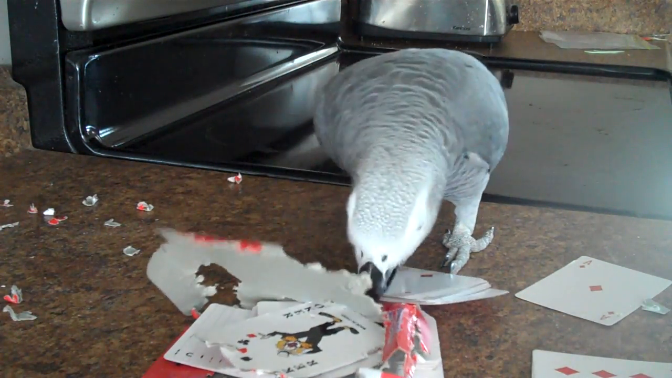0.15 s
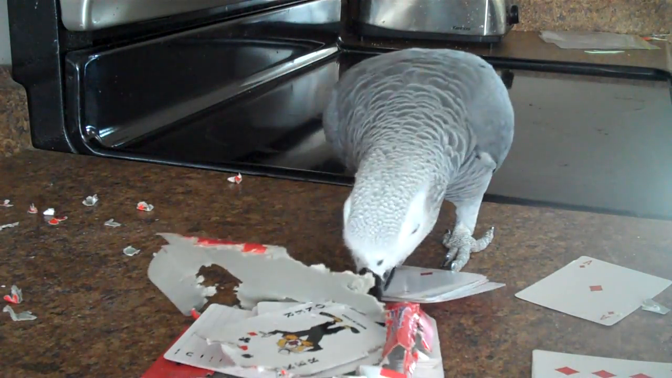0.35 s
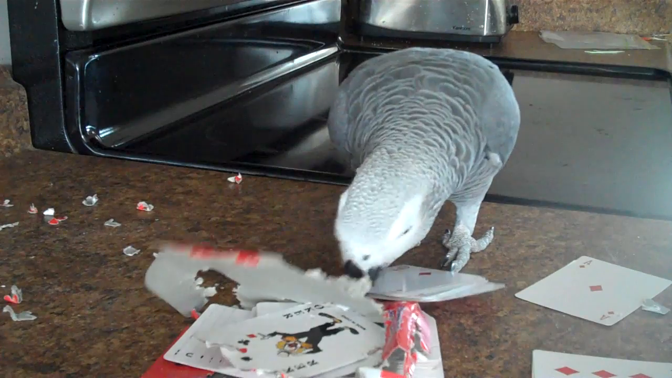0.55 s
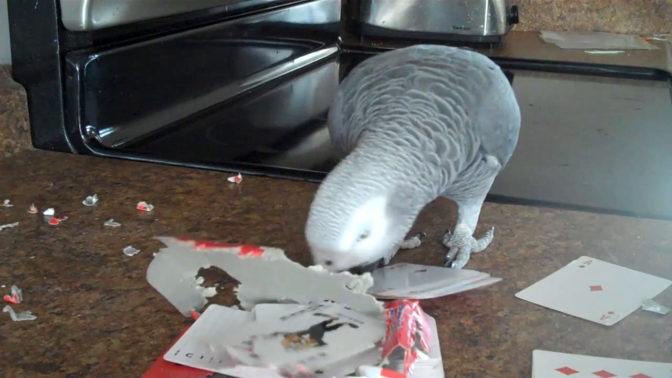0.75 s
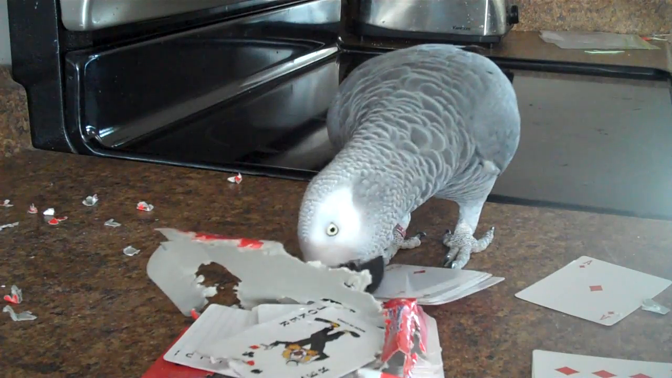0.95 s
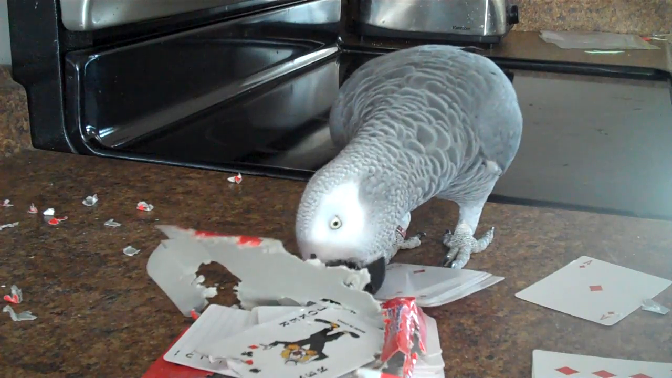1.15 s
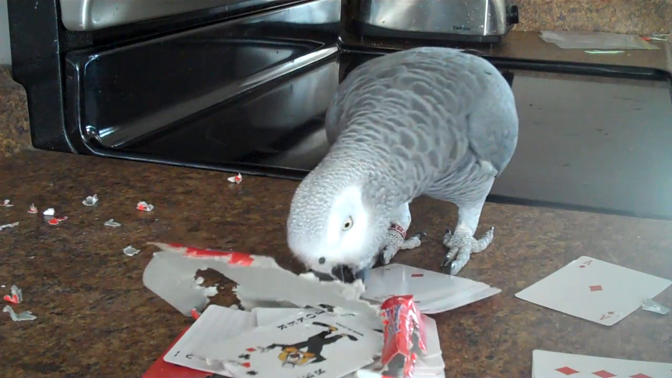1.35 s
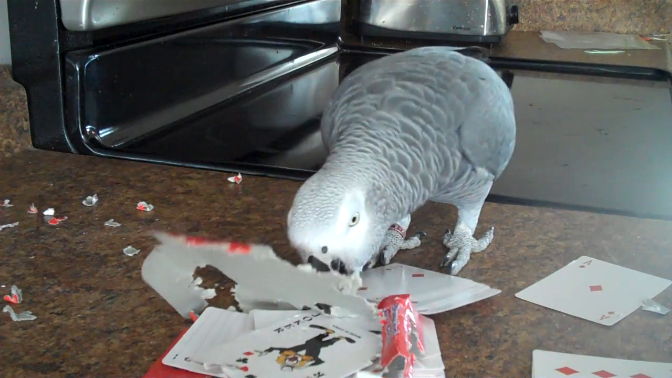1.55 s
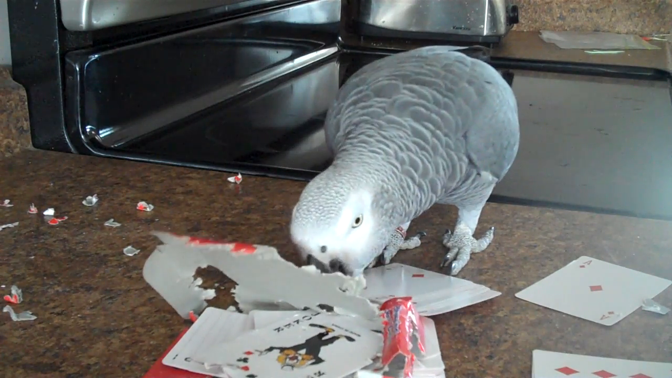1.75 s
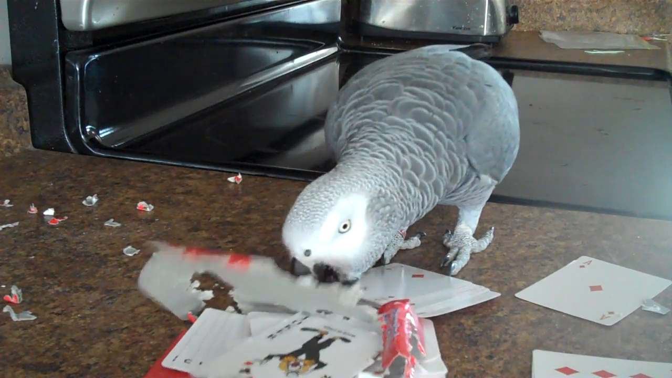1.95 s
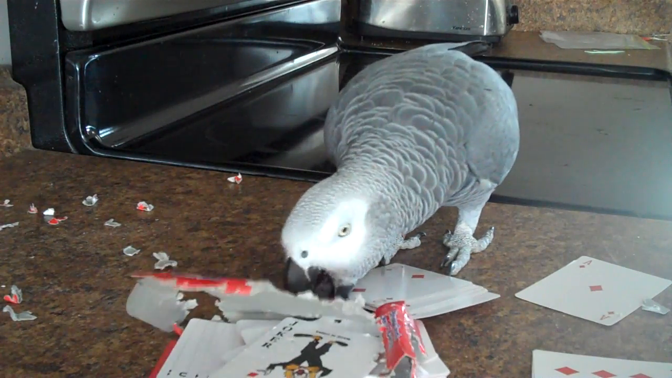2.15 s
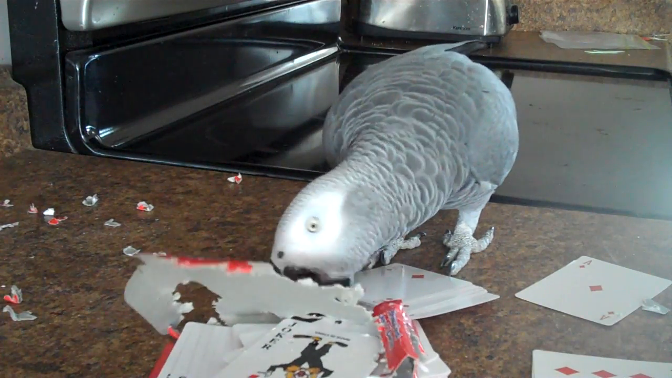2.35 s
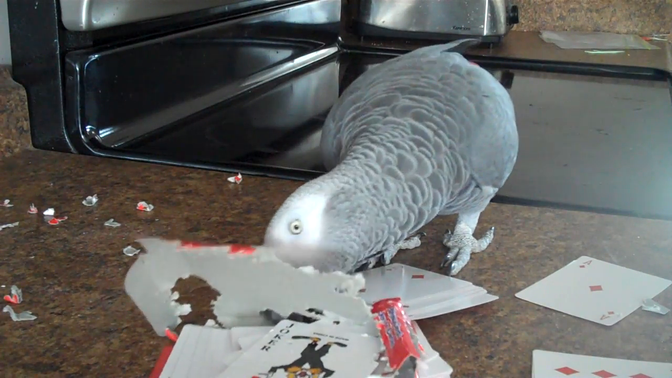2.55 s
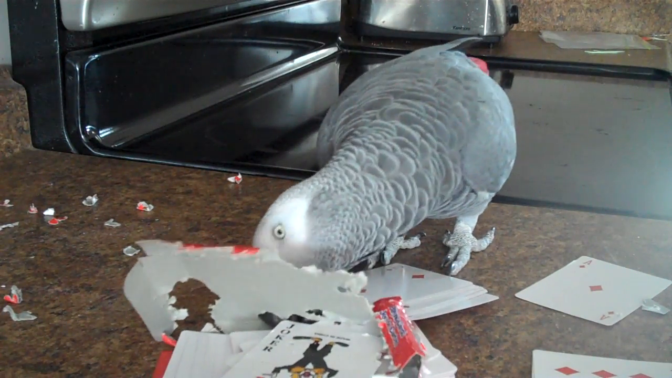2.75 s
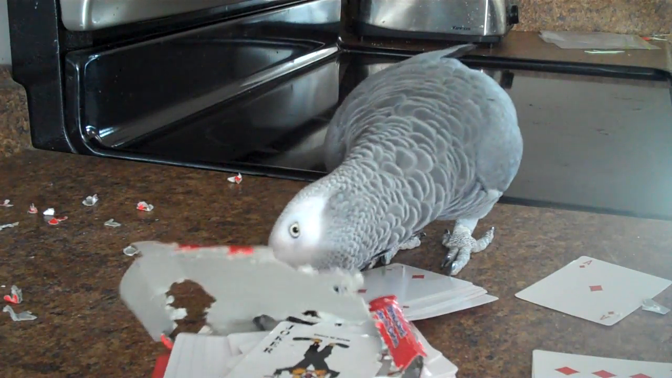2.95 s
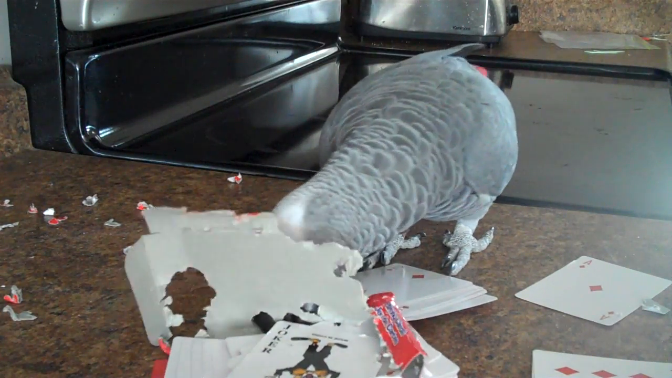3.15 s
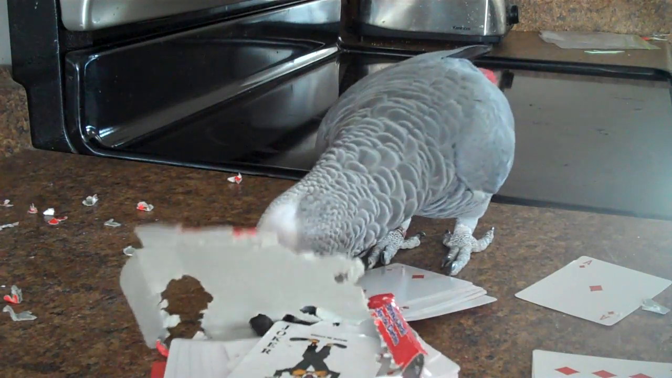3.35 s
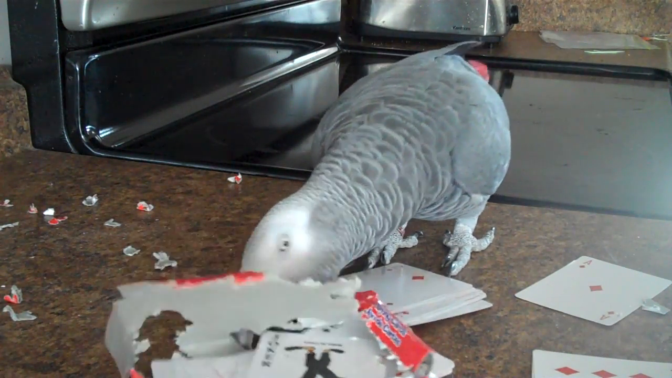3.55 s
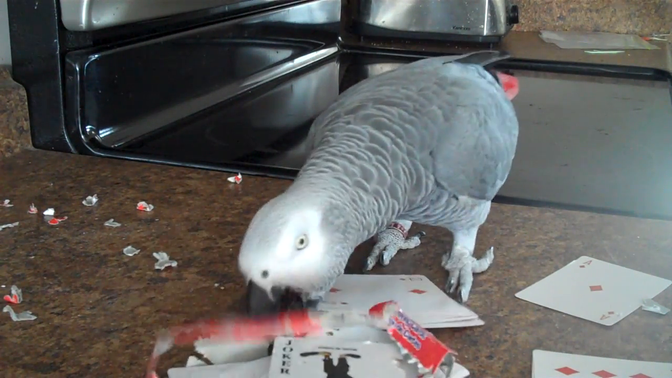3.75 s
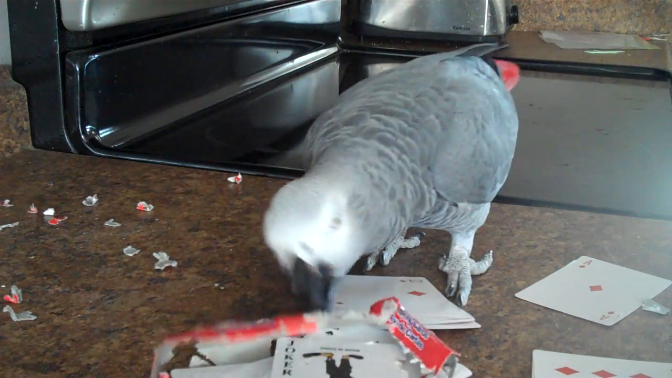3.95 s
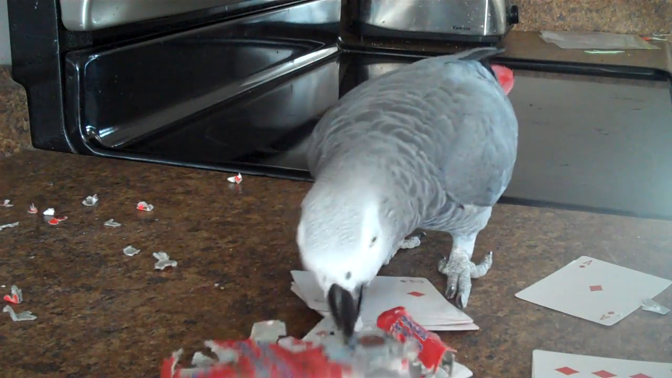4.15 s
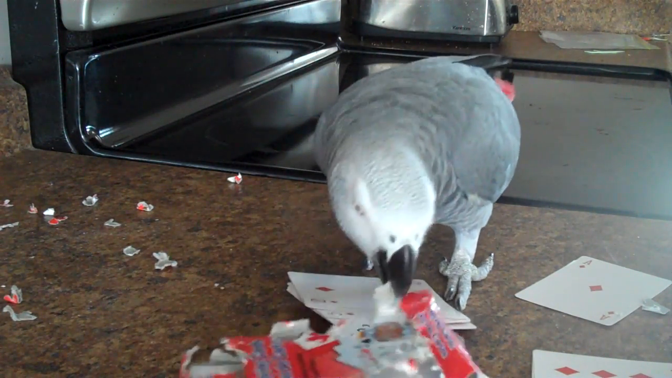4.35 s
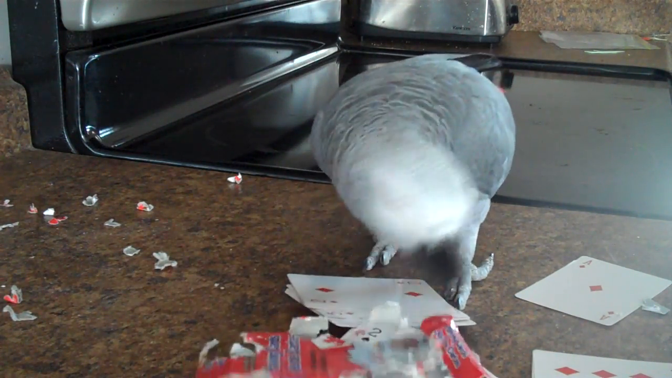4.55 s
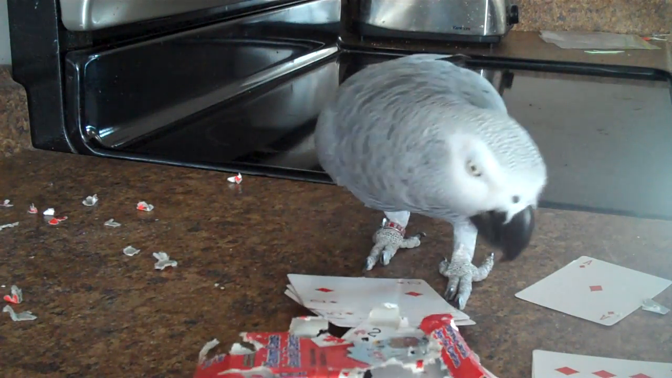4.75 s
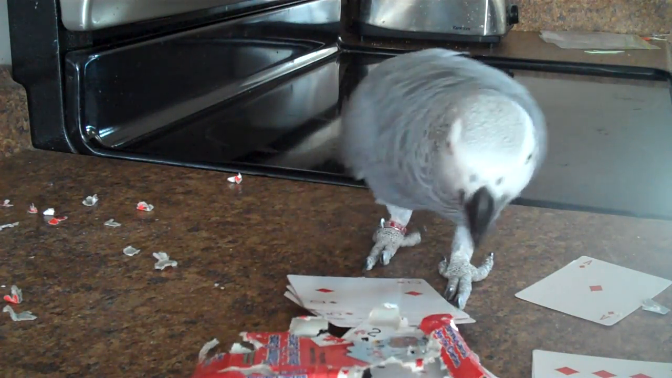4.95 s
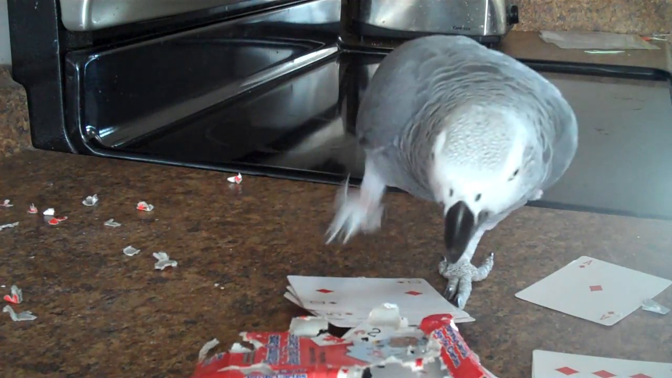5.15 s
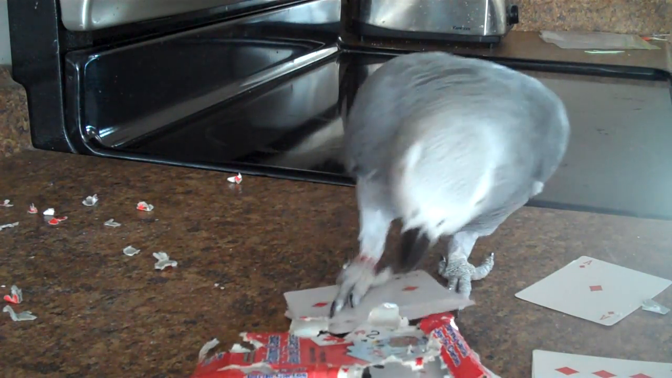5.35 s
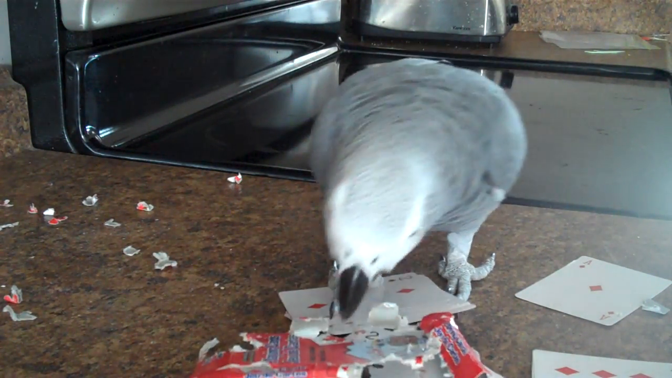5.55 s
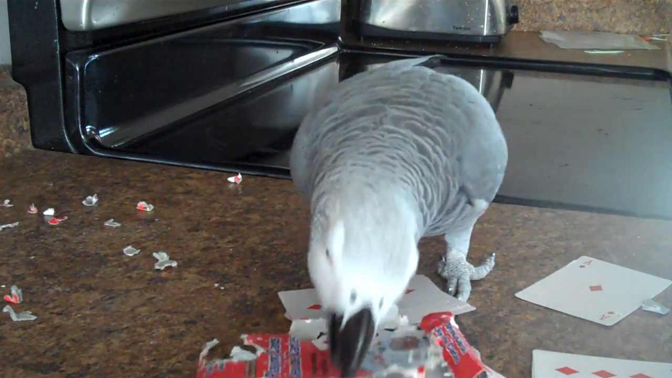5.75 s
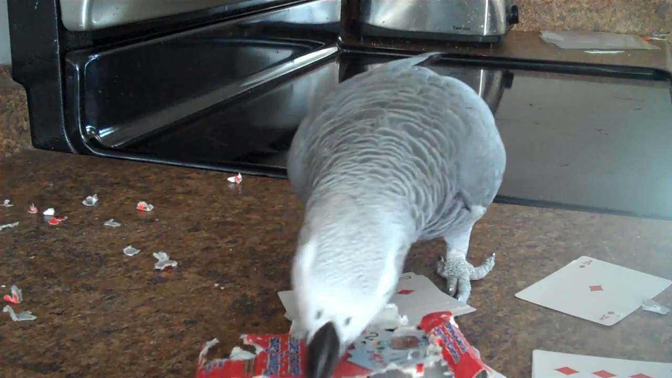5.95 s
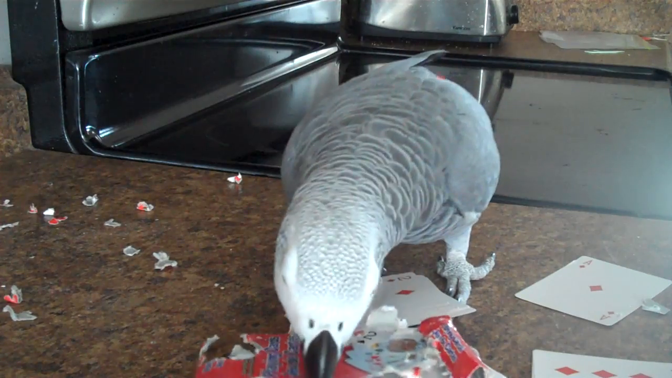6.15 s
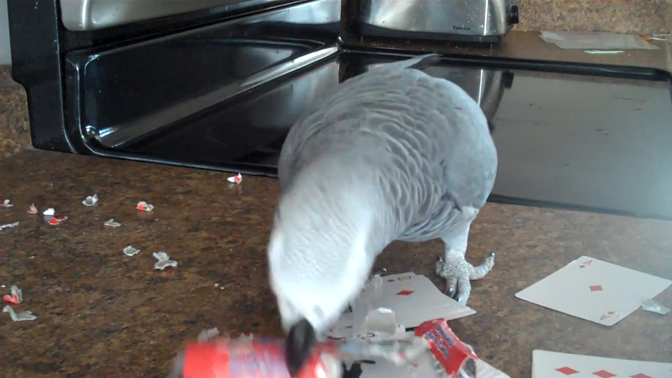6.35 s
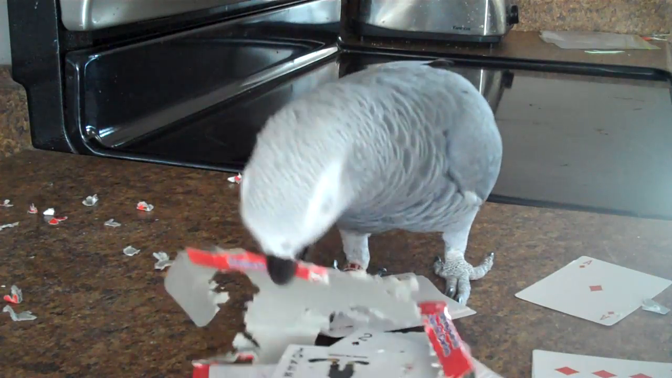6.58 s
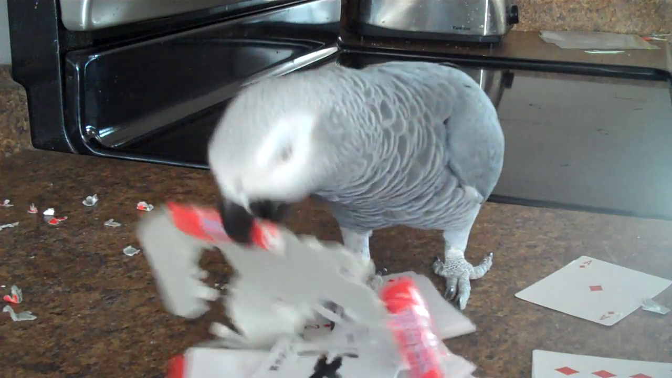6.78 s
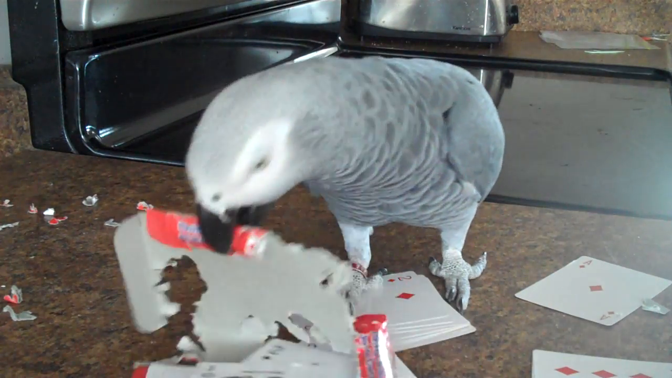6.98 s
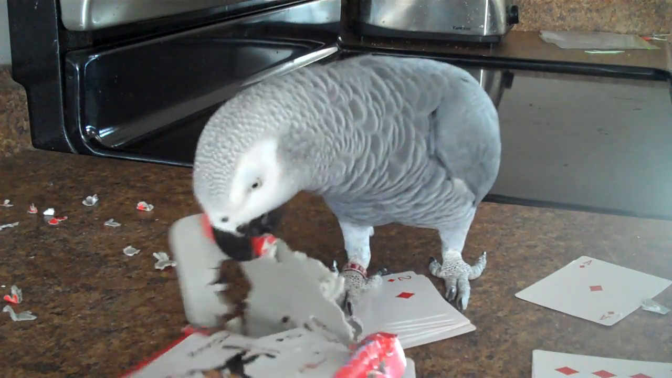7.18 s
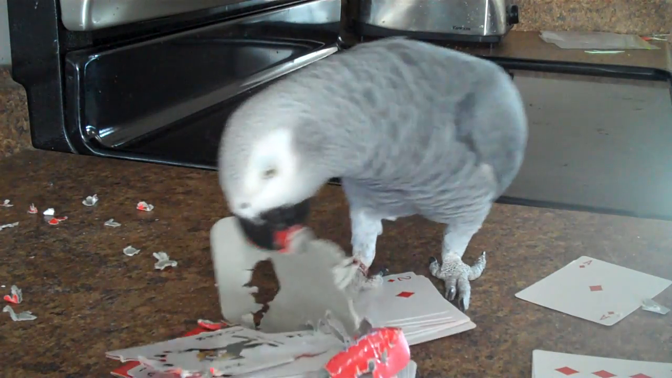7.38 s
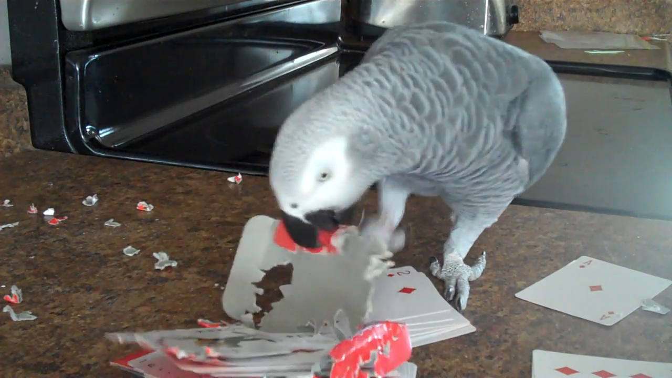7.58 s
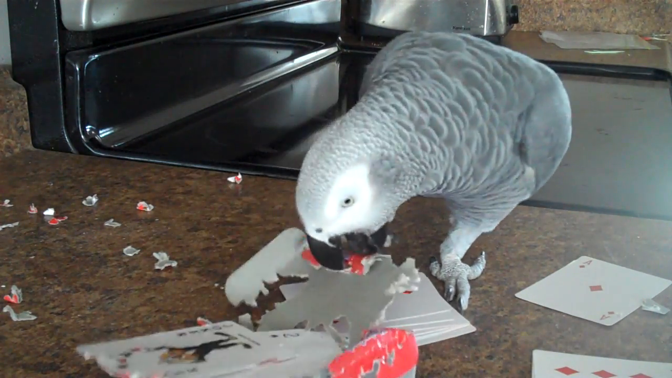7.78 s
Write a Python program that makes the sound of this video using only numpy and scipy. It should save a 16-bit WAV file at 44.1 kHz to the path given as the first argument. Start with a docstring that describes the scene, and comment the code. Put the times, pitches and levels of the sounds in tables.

```python
"""An appliance hums in a small, hard kitchen while card rubs softly on card and fibres snap in a beak.
A parrot chews a cardboard card box on the counter and drags it over loose playing cards.
Filtered noise and short rings make the rubs, crackles, snaps, squeaks and scuffs; sines make the hum.
Late on, the lifted pack drops: decaying counter tones and a puff of air.
A stereo microphone with two close ports stands nearby."""
import sys
import numpy as np
from scipy import signal
from scipy.fft import rfft, irfft, next_fast_len
from scipy.io import wavfile
from scipy.ndimage import uniform_filter1d

SR = 44100
rng = np.random.default_rng(int(sys.argv[2]) if len(sys.argv) > 2 else 0)


def master_out(mix):
    """Clip the mix to full scale and print it as 16-bit PCM to the path in sys.argv[1]."""
    frames = np.transpose(np.atleast_2d(mix))
    ceiling = np.clip(frames, -1, 1)
    pcm = np.round(ceiling * 32767).astype(np.int16)
    wavfile.write(sys.argv[1], SR, pcm)


N = 344862  # length of the scene in samples
TAPS = 2048  # length of a filter response in samples
HZ = np.fft.rfftfreq(TAPS, 1 / SR) + 1  # filter frequencies, 1 Hz up so that none is zero


def gain_of(db):
    """Decibels to amplitude."""
    return 10 ** (np.asarray(db) / 20)


def evened(x):
    """Scales to rms 1."""
    return x / np.sqrt(np.mean(x ** 2) + 1e-20)


def read(points, hz):
    """Reads a table on a log-frequency axis."""
    f, value = np.transpose(points)
    return np.interp(np.log(hz + 1), np.log(f + 1), value)


def add(mix, s, sound):
    """Adds a sound to the mix at s seconds."""
    part = mix[..., max(round(s * SR), 0):][..., :sound.shape[-1]]
    part += sound[..., :part.shape[-1]]


def causal(gain):
    """Minimum-phase impulse response with the given gain at HZ."""
    log_gain = np.log(np.maximum(gain, 1e-5))
    circle = np.concatenate([log_gain, log_gain[-2:0:-1]])
    spectrum = np.exp(np.conj(signal.hilbert(circle)))
    return irfft(spectrum[:len(gain)])


def coloured(points):
    """Impulse response of a spectrum table in dB."""
    return causal(gain_of(read(points, HZ)))


def convolve(x, response):
    """Filters one or two channels and keeps their length."""
    return signal.oaconvolve(np.atleast_2d(x), np.atleast_2d(response), axes=1)[:, :x.shape[-1]]


def smooth_noise(length, first, second):
    """Slow random drift of rms 1: noise averaged twice, over so many samples."""
    noise = uniform_filter1d(rng.standard_normal(length), size=first)
    return evened(uniform_filter1d(noise, size=second))


# Likeness of diffuse sound at the two microphone ports.
# Each row: frequency in Hz, likeness from 0 (unrelated) to 1 (the same).
PORT_LIKENESS = [(30, 0), (120, 0.23), (300, 0.97), (650, 0.56), (1400, 0.62), (3000, 0.75), (5000, 0.29),
                 (7000, 0.6), (14000, 0)]


def diffuse(pair):
    """Blends two unrelated signals until they are as alike as diffuse sound at two close ports."""
    length = pair.shape[1]
    size = next_fast_len(length, True)
    a, b = rfft(pair, size)
    same = np.clip(read(PORT_LIKENESS, np.fft.rfftfreq(size, 1 / SR)), 0, 1)
    mid = a * np.sqrt((1 + same) / 2)
    side = b * np.sqrt((1 - same) / 2)
    return irfft(np.array([mid + side, mid - side]), size)[:, :length]


def slips(length, per_s, spread_db):
    """Sizes of tiny fibre slips at random moments; a wider spread makes a few of them large."""
    size = gain_of(spread_db * np.minimum(rng.exponential(1, length), 4))
    return size * (rng.random(length) < per_s / SR)


def card_ring(hz, q, low_hz=620, high_hz=11500, skirt=1.25, travel_s=0.000298):
    """One resonance at unit energy; bending waves are slower when low, so the ring chirps down."""
    radiation = 1 / np.sqrt((1 + (low_hz / HZ) ** 4) * (1 + (HZ / high_hz) ** 4))
    detuning = q * (HZ / hz - hz / HZ)
    ring = causal(radiation / (1 + detuning ** 2 / skirt) ** (skirt / 2))
    travel = np.exp(-4 * np.pi * 1j * travel_s * np.sqrt(hz * HZ))  # delays the lows most
    ring = irfft(rfft(ring) * travel)
    return ring / np.linalg.norm(ring)


# Colour of the fan's air in the room. Each row: frequency in Hz, relative level in dB per Hz.
FAN_AIR = [(20, -28), (45, -2), (80, -0.5), (100, -1), (160, -3.5), (230, -1), (390, 3), (510, -7.5),
           (1000, -6.5), (1500, -12.5), (3500, -14.5), (7000, -25), (10000, -13.5), (14000, -12)]
# Tones of the appliance. Each row: mean frequency in Hz, rms level in dB ahead of the ports.
MOTOR_TONES = [(59.1, -71), (119.2, -73), (317.8, -67), (398.4, -81), (427.5, -79)]


def appliance(air_db=-56.0, waver=0.00095):
    """Steady fan noise with a few faint tones that follow one motor's speed."""
    air = evened(convolve(diffuse(rng.standard_normal((2, N))), coloured(FAN_AIR)))
    drift = evened(uniform_filter1d(rng.standard_normal(N), size=9000))
    turn = 2 * np.pi * np.cumsum(1 + waver * drift) / SR
    tones = sum(gain_of(db) * np.sqrt(2) * np.sin(hz * turn) for hz, db in MOTOR_TONES)
    return gain_of(air_db) * air + tones


# Short strokes of card on card. Each row: start in seconds, length in seconds,
# surface hiss in dB ahead of a common trim, flexing panel in dB against that hiss.
SHORT_STROKES = [(0.072, 0.16, -58.5, -6), (0.378, .054, -61, -3), (0.459, 0.16, -56, -9),
                 (0.617, 0.14, -54.5, -13), (0.76, .21, -57, -9), (0.986, .075, -58.5, -4),
                 (1.1, .16, -58, -5.5), (1.316, .2, -58.5, -8.5), (1.77, .065, -57.5, -10),
                 (1.885, 0.025, -46, -7), (1.978, .12, -44.5, -16), (2.181, .07, -55, -6),
                 (2.299, 0.11, -50, -8.5), (2.496, .22, -50.5, -10), (2.749, 0.12, -55, -5.5),
                 (2.898, 0.062, -50.5, -9), (2.961, 0.16, -47.5, -11.5), (3.102, 0.23, -54, -11),
                 (3.373, .12, -43, -18), (3.513, .42, -46.5, -11), (3.642, 0.097, -37.5, -18.5),
                 (4.02, .11, -49, -13), (4.151, 0.11, -48.5, -13.5), (4.281, 0.29, -47, -21),
                 (4.964, .12, -59, -16), (5.356, 0.073, -52, -10.5), (5.784, 0.025, -49, -1),
                 (6.071, 0.018, -49, -15), (6.14, 0.085, -50.5, -12.5), (7.351, .14, -54.5, -12),
                 (7.503, 0.29, -54, -16)]
ATTACK_S, RELEASE_S = 0.041, 0.019  # the card starts to slide, and comes to rest
RESTING_DB, RESTING_FLEX_DB = -66.5, -11  # the card stirs a little under the bird between strokes
# The bird hauls the box up in one long pull.
# Each row: time in seconds, surface hiss in dB ahead of a common trim.
LONG_PULL = [(6.23, -65), (6.399, -49), (6.605, -44.5), (6.769, -50), (6.823, -38.5), (6.946, -43.5),
             (7.147, -43.5), (7.175, -38), (7.301, -41), (7.372, -61)]
PULL_FLEX_DB = -16.5  # flexing panel against hiss during the long pull


def rubbing():
    """Hiss and panel levels in dB: short strokes catch, hold and let go; one long pull swells."""
    t = np.arange(N) / SR
    pull = gain_of(np.interp(t, *np.transpose(LONG_PULL), left=-np.inf, right=-np.inf))
    resting = gain_of([[RESTING_DB], [RESTING_DB + RESTING_FLEX_DB]])
    power = resting ** 2 + np.array([pull, pull * gain_of(PULL_FLEX_DB)]) ** 2
    for start, length, db, flex_db in SHORT_STROKES:
        u = t[:int((length + 10 * RELEASE_S) * SR)]
        speed = np.minimum(u / ATTACK_S, 1) * np.exp(-np.maximum(u - length, 0) / RELEASE_S)
        add(power, start, (gain_of([[db], [db + flex_db]]) * speed) ** 2)
    return 10 * np.log10(power)


def blurred(shape, across, along):
    """Smooth random patches of rms 1, so many cells wide in frequency and in time."""
    patches = uniform_filter1d(rng.standard_normal(shape), across, 0)
    return evened(uniform_filter1d(patches, along, 1))


def shifting(x, patchy_db):
    """The contact point wanders over the card, so each instant favours other resonances."""
    z = signal.stft(x, nperseg=256)[2]
    slow = blurred(z.shape[1:], across=4, along=12)
    quick = blurred(z.shape[1:], across=9, along=2)
    return signal.istft(z * gain_of(patchy_db * evened(slow + quick)), nperseg=256)[1][:, :N]


# Colour of slips on the card's face. Each row: frequency in Hz, relative level in dB per Hz.
FACE_HISS = [(600, -42), (1800, -15.5), (3200, -3), (5000, -0.5), (7000, 0), (9000, -2), (11000, -4.5),
             (14000, -8.5)]
# Colour of the shaken box panels. Each row: frequency in Hz, relative level in dB per Hz.
BOX_PANEL = [(150, -12), (500, -7.5), (900, -4), (1400, -3.5), (2000, 1.5), (2700, -1), (4000, -13),
             (8000, -27.5)]


def drag(hiss_db=-1.0, panel_db=1.5, judder_db=2.4, lurch_db=0.5):
    """Dense slips hiss on the card's face and shake its panels while the grip judders and lurches."""
    hiss, panel = rubbing()
    judder = judder_db * smooth_noise(N, 350, 120)
    lurch = lurch_db * smooth_noise(N, 1400, 500)
    grains = slips(N, per_s=9000, spread_db=1.0) * gain_of(judder + lurch)
    out = np.zeros((2, N))
    for colour, level in ((FACE_HISS, hiss + hiss_db), (BOX_PANEL, panel + panel_db)):
        rub = convolve(diffuse(grains * rng.standard_normal((2, N))), coloured(colour))
        rub = shifting(rub, patchy_db=2.2)
        out += evened(rub) * gain_of(level)
    return out


def crackle(count=900, level_db=9, spread_db=2.0, low_hz=1300, high_hz=9000, q=2.0):
    """Single fibres catch and let go, each with its own pitch, louder the harder the card is dragged."""
    hiss = rubbing()[0]
    out = np.zeros(N)
    for when, pitch, size in rng.random((count, 3)):
        at = int(when * N)
        db = hiss[at] + level_db + spread_db * min(-np.log(1 - size), 2)
        hz = low_hz + (high_hz - low_hz) * pitch ** 1.5  # more of them low
        add(out, at / SR, gain_of(db) * card_ring(hz, q))
    return out


GENTLE_DB = -51.5  # hiss level of a gentle nibble


def nibbles(count=70, level_db=-32, low_hz=3000, high_hz=9000, q=4.3, after_db=-1):
    """Rows for small snaps at random moments, one in each equal span, that grow with the stroke's hiss."""
    hiss = rubbing()[0]
    rows = []
    for k, (when, pitch) in enumerate(rng.random((count, 2))):
        at = int((k + when) / count * N)
        db = level_db + hiss[at] - GENTLE_DB
        rows.append((at / SR, db, low_hz * (high_hz / low_hz) ** pitch, q, after_db))
    return rows


# Snaps and taps of card. Each row: time in seconds, energy in dB ahead of a common trim,
# ring in Hz, sharpness Q, crumble in dB against the break ahead of its own trim.
CARD_SNAPS = [(0.136, -22, 8150, 4.5, -13), (0.1521, -23, 2380, 0.33, 4.5), (0.1562, -23, 8800, 0.98, 3),
              (0.1909, -21.5, 6140, 0.69, -13), (0.2814, -16.5, 1930, 1.7, -5), (0.5054, -25, 9400, 5, 5),
              (0.6836, -24, 6380, 2.4, -18), (0.7114, -26, 7830, 0.54, 0), (0.7375, -25.5, 3750, 0.25, 2),
              (0.7865, -19.5, 8800, 0.83, -10), (0.843, -22, 4400, 1.2, -2), (0.87, -18.5, 9000, 0.17, -7),
              (0.914, -28.5, 10200, 0.31, 7), (0.9201, -21.5, 6600, 0.93, 3.5),
              (1.244, -27, 10000, 1.4, -1), (1.8651, -23.5, 3720, 1.3, -3), (1.912, -24, 7200, .4, 0),
              (2.3415, -25, 4070, 1.2, 4), (2.3998, -16.5, 6600, 5.1, -18), (2.5545, -20, 4360, .65, -4),
              (2.929, -17.5, 3830, 0.16, 0), (2.9936, -13, 7200, .5, -15), (3.079, -21, 1660, .6, -7),
              (3.2372, -23, 3580, 4.8, -13), (3.392, -25, 6500, 0.78, 3), (3.518, -21.5, 1590, 1.6, -8),
              (3.6269, -6.5, 4730, 5.3, -22), (3.819, -27, 1150, 1.5, -4), (3.9166, -17.5, 7400, 1.9, 2),
              (3.93, -20.5, 1100, 0.4, -9), (4.066, -25, 6600, 3.9, 3.5), (4.186, -17.5, 6600, 2.7, 6),
              (4.1973, -4, 3700, 1.8, -13), (4.313, -27.5, 5700, 2.6, 1), (4.359, -15, 4300, 0.99, 2),
              (4.4, -16, 7200, 0.44, 0), (4.5637, -19, 6500, 4.6, -2), (4.5793, -23.5, 4470, 0.6, 6),
              (5.084, -28.5, 3600, 1.1, 2), (5.3063, -12, 4870, 1.6, -9), (5.3066, -19, 2280, 5.3, -5),
              (5.314, -27, 6930, 2.2, -2), (5.684, -17.5, 5200, 9, -2), (5.7436, -25, 3460, 0.18, 5.5),
              (5.756, -26, 5460, 7.5, 1), (5.8027, -17, 6800, 0.92, -6), (5.8873, -25.5, 8800, 0.49, -15),
              (6.083, -24, 2880, 2, -4), (6.1984, -20.5, 4400, 0.76, 1), (6.261, -18.5, 7700, 0.72, -6),
              (6.291, -21, 3400, 0.94, 0.5), (6.582, -19, 8850, 1.1, -14), (6.6233, -17, 3400, 0.14, 0),
              (6.656, -8, 6760, 2, -20), (6.7469, -15, 4340, 0.82, -6), (6.8141, -13, 4450, 0.37, 7),
              (6.8193, 3.5, 1730, 1.4, -20), (6.832, -19, 5500, 1.2, -17), (6.8348, -3.5, 3120, 0.85, -21),
              (6.873, -12, 4320, 1.9, -15), (7.1872, -17, 1790, 2, -16), (7.296, -16, 2360, 1, -10),
              (7.4564, -21, 7400, 3, -11), (7.554, -25, 7400, 3.3, 3.5), (7.6615, -15, 9500, 0.44, -1),
              (7.734, -22.5, 4200, 1.4, 4.5)]


def snaps(chatter_db=-6, chatter_s=0.00031, crumble_s=0.0061, crumble_db=1.5, level_db=-3.0,
          overtone_db=-11, overtone_growth=0.79, overtone_hz=12500):
    """A crack builds, breaks and rings the card, with a bright overtone on the loudest; fibres then crumble."""
    out, t = np.zeros((2, N)), np.arange(TAPS) / SR
    build_up = 16  # samples from the first strain to the break
    overtone = card_ring(overtone_hz, q=1.4)
    for s, db, hz, q, after_db in CARD_SNAPS + nibbles():
        chatter = evened(rng.standard_normal(TAPS) * t * np.exp(-t / chatter_s))
        fibres = slips(TAPS, per_s=6600, spread_db=0.0) * rng.standard_normal((2, TAPS))
        crumble = evened(diffuse(fibres * np.exp(-t / crumble_s) * np.minimum(t / 0.0018, 1)))
        force = gain_of(chatter_db) * chatter + gain_of(after_db + crumble_db) * crumble
        force /= np.sqrt(TAPS)
        force[:, build_up] += 1  # the break itself
        # the overtone's share rises with the snap's level
        ring = card_ring(hz, q) + gain_of(overtone_db + overtone_growth * db) * overtone
        add(out, s - build_up / SR, gain_of(db + level_db) * convolve(force, ring))
    return out


# Squeaks and short scuffs of card. Each row: start in seconds, length in seconds,
# level in dB before its fades, resonance in Hz, half-width in Hz.
CARD_SQUEAKS_AND_SCUFFS = [(4.013, 0.031, -53, 6340, 1200), (4.317, 0.12, -48, 3400, 560),
                           (4.421, 0.14, -48, 3300, 650), (4.918, 0.016, -61, 6540, 1800),
                           (5.666, 0.035, -54, 5200, 650), (6.993, 0.018, -41.5, 4900, 1800)]


def squeaks_and_scuffs(grip_db=4.0):
    """Squeaks and short scuffs of card: noise through a narrow or broad resonance, in ragged spurts."""
    out = np.zeros((2, N))
    for s, length, db, hz, width in CARD_SQUEAKS_AND_SCUFFS:
        count = int(length * SR)
        ring = causal(1 / (1 + ((HZ - hz) / width) ** 2))
        grip = gain_of(grip_db * evened(uniform_filter1d(rng.standard_normal(SR), size=400)))
        friction = diffuse(grip * rng.standard_normal((2, SR)))[:, :count]
        rub = evened(convolve(friction, ring))
        add(out, s, gain_of(db) * rub * signal.windows.tukey(count, .4))
    return out


# Landings of the dropped pack. Each row: time in seconds, relative level in dB.
LANDINGS = [(6.821, -33), (6.829, -38), (6.836, -36.5)]
# Ringing modes of the counter. Each row: frequency in Hz, relative level in dB,
# time to fall by 60 dB in seconds.
COUNTER_MODES = [(104, -10, 0.26), (165, -20, 0.037), (224, 0, 0.052), (305, 1, 0.081), (431, -3.5, 0.12),
                 (564, -10, 0.079), (690, -5, 0.051)]
# Colour of the air pushed out from under the pack. Each row: frequency in Hz, relative level in dB per Hz.
AIR_PUFF = [(40, -30), (90, -26), (200, 4.5), (400, 5.5), (700, -4), (1400, -19), (3000, -30)]


def thumps(rise_s=0.0038, ring_db=-4, puff_db=2, puff_s=0.0089):
    """The falling cards land in quick succession, push out air and shake the counter."""
    out, t = np.zeros(N), np.arange(SR // 3) / SR
    modes = np.zeros(len(t))
    for k, (hz, level, t60) in enumerate(COUNTER_MODES):
        modes += (-1) ** k * gain_of(level - 60 * t / t60) * np.sin(2 * np.pi * hz * t)
    for s, db in LANDINGS:
        air = evened(convolve(rng.standard_normal(len(t)), coloured(AIR_PUFF))[0])
        blow = gain_of(ring_db) * modes + gain_of(puff_db) * air * np.exp(-t / puff_s)
        add(out, s, gain_of(db) * blow * (1 - np.exp(-(t / rise_s) ** 2)))
    return out


# Decay of the room. Each row: frequency in Hz, time to fall by 60 dB in seconds.
ROOM_DECAY = [(200, 0.2), (1500, 0.33), (6000, .24), (14000, 0.62)]


def reflections(near_db=-8.5, near_s=0.0051, tail_db=-9):
    """Counter and appliances scatter the sound at once; the walls add a short tail."""
    t = np.arange(SR // 2) / SR
    scatter = diffuse(rng.standard_normal((2, len(t))) * (rng.random(len(t)) < 3000 / SR))
    near = evened(scatter * np.exp(-t / near_s) * (t > .0012))
    hz, at, z = signal.stft(diffuse(rng.standard_normal((2, len(t)))), SR, nperseg=256)
    decay = gain_of(-60 * at / read(ROOM_DECAY, hz)[:, None])
    tail = signal.istft(z * decay, SR, nperseg=256)[1][:, :len(t)]
    tail = evened(tail * (t > .006))
    return (gain_of(near_db) * near + gain_of(tail_db) * tail) / np.sqrt(len(t))


def kitchen(x, rounds_per_s=1.695, count=3):
    """As bird and box move, a few patterns of reflections fade into one another in turn."""
    turn = np.pi * rounds_per_s * np.arange(N) / SR
    # the squared shares always sum to one
    shares = [np.sqrt(2 / count) * np.cos(turn + np.pi * k / count) for k in range(count)]
    return x + sum(convolve(x * share, reflections()) for share in shares)


def scene():
    """The bird's work on the counter, heard in the room over the hum."""
    work = drag() + crackle() + snaps() + squeaks_and_scuffs() + thumps()
    return appliance() + kitchen(work)


# Treble resonance of the left port's cavity. Each row: frequency in Hz, gain in dB.
LEFT_CAVITY = [(100, -1.1), (700, 4.5), (3000, 1.13), (4000, 2), (4700, 2.5), (5500, 3.5), (6500, 6),
               (7500, 13), (8400, 5.5), (10000, -3), (12000, -4), (14000, -4)]
# Treble resonance of the right port's cavity. Each row: frequency in Hz, gain in dB.
RIGHT_CAVITY = [(100, -2.5), (700, 0.35), (3000, -0.6), (4000, -0.5), (4700, 0.5), (5500, 2), (6400, 9.5),
                (7100, 4), (8000, -4.5), (10000, -12), (12000, -12), (14000, -8)]
EDGE_HZ = 14350  # upper band limit


def record(dry):
    """The resonance of each microphone port, then the band limit."""
    ports = np.array([coloured(LEFT_CAVITY), coloured(RIGHT_CAVITY)])
    low_pass = signal.firwin(255, EDGE_HZ, window=("kaiser", 8), fs=SR)
    return signal.oaconvolve(convolve(dry, ports), low_pass[None], "same", axes=1)


dry = scene()
out = record(dry)
master_out(out)
```